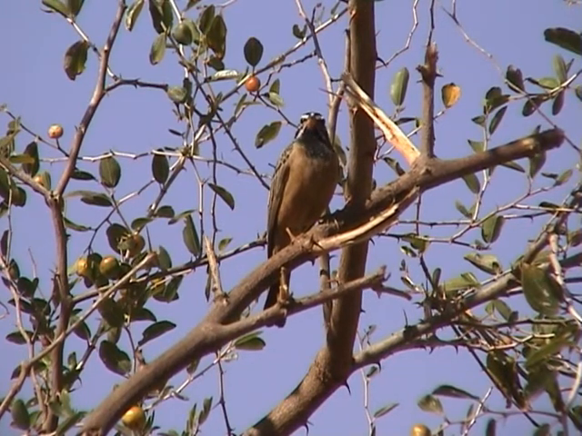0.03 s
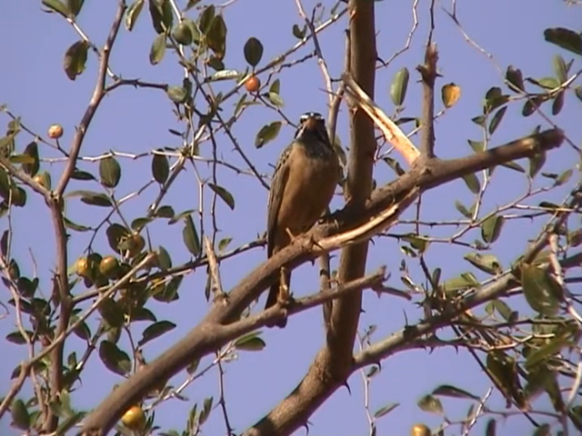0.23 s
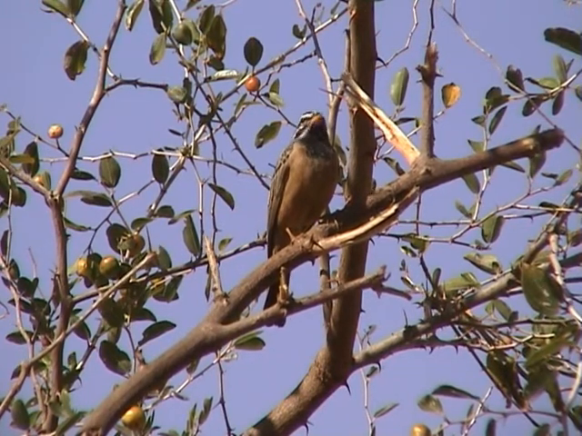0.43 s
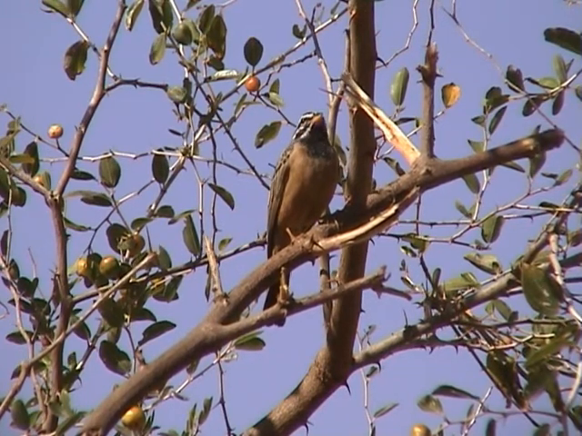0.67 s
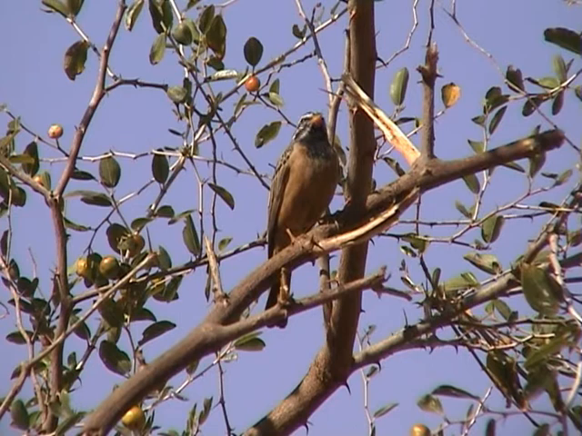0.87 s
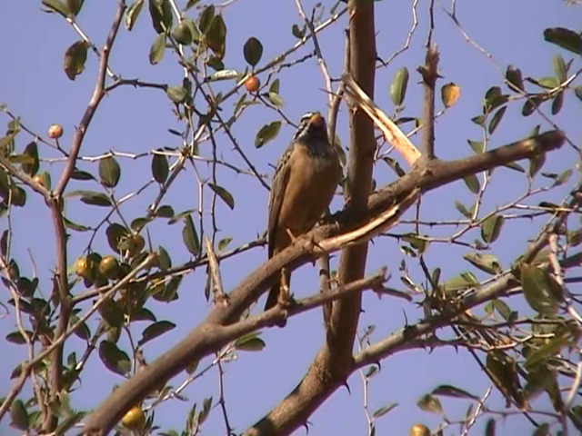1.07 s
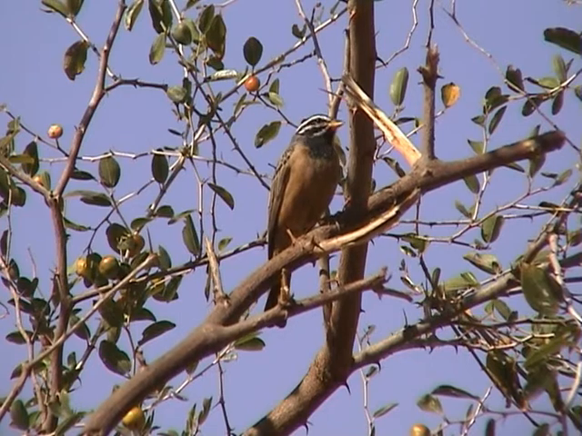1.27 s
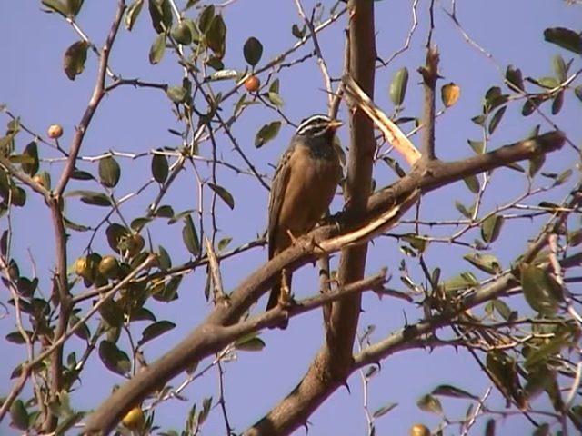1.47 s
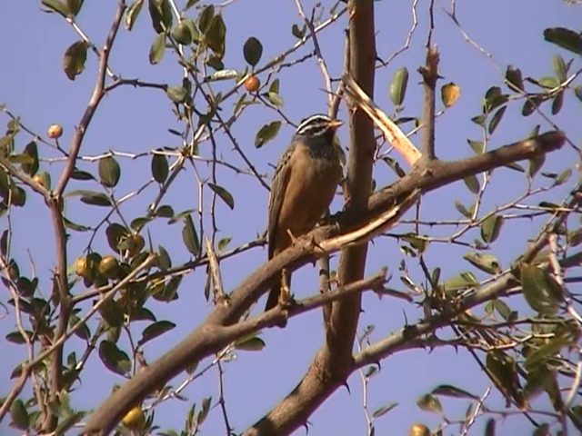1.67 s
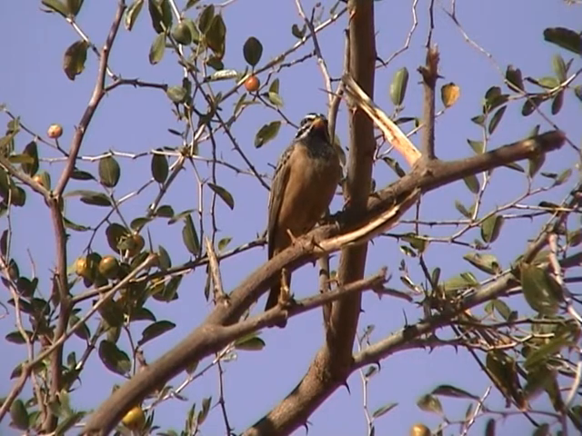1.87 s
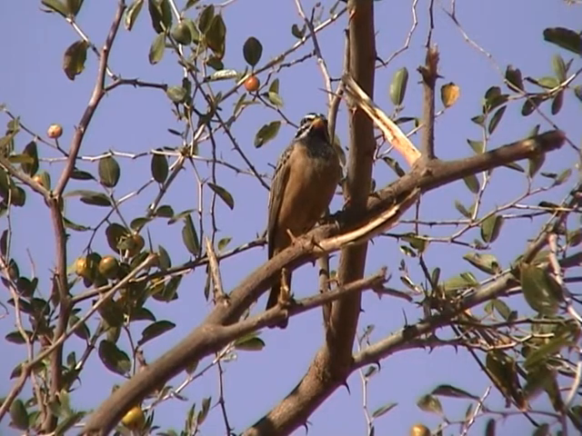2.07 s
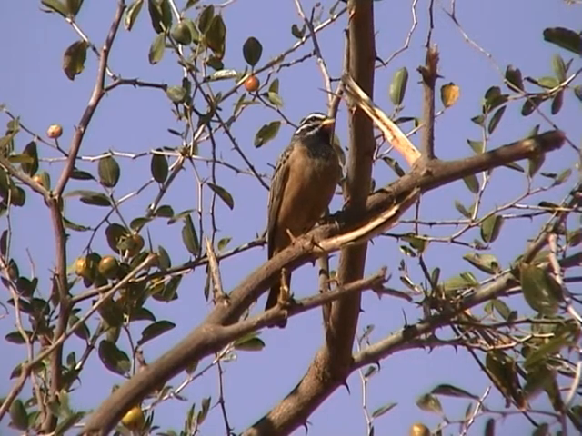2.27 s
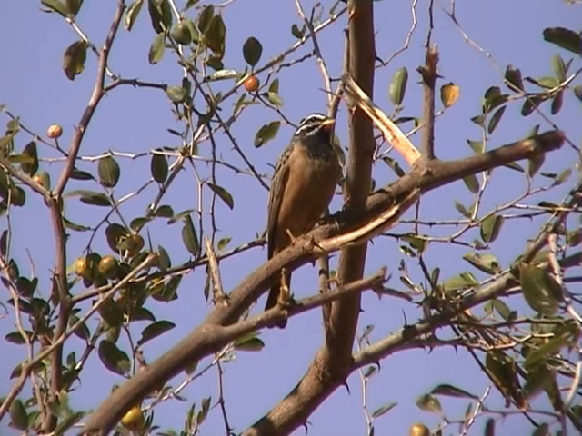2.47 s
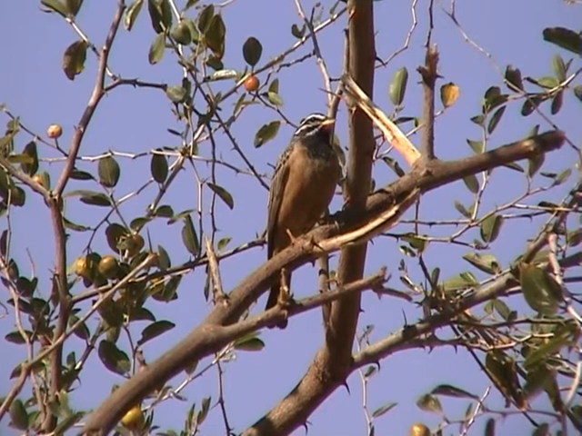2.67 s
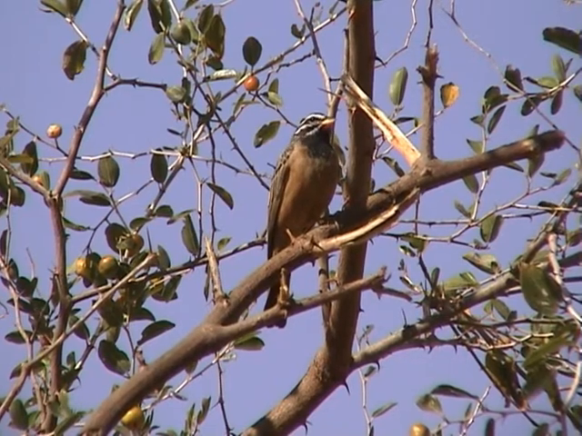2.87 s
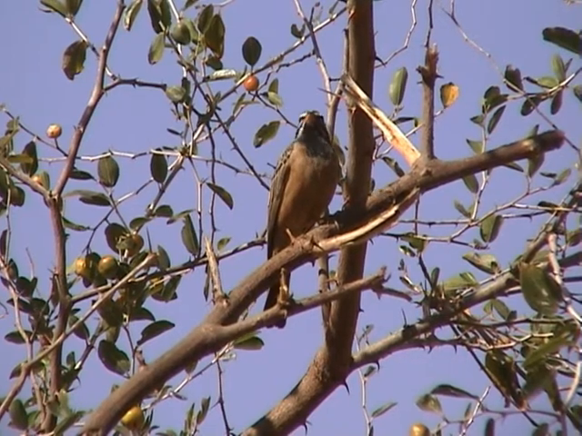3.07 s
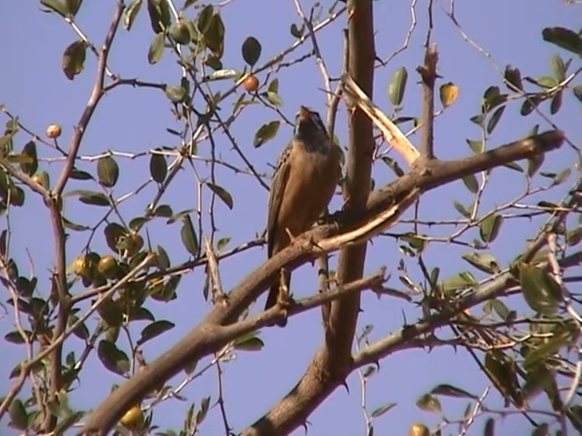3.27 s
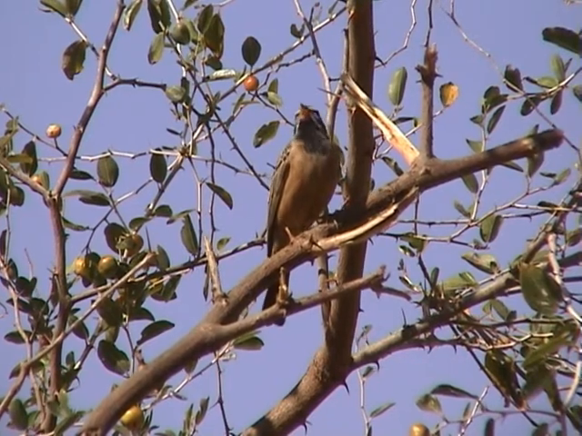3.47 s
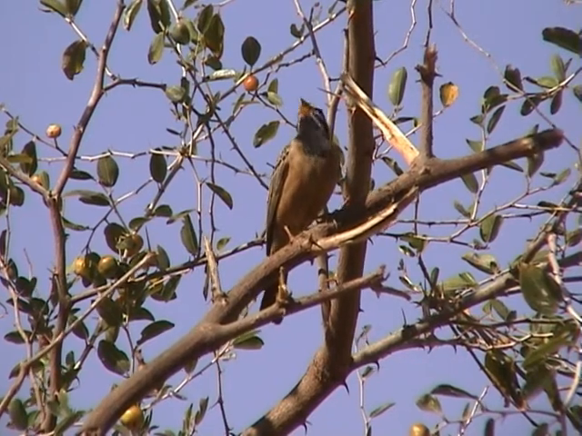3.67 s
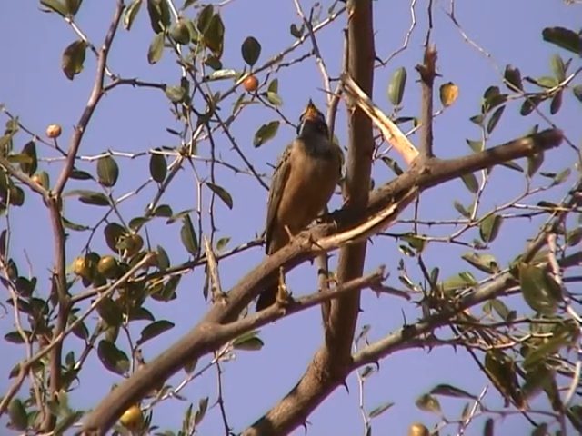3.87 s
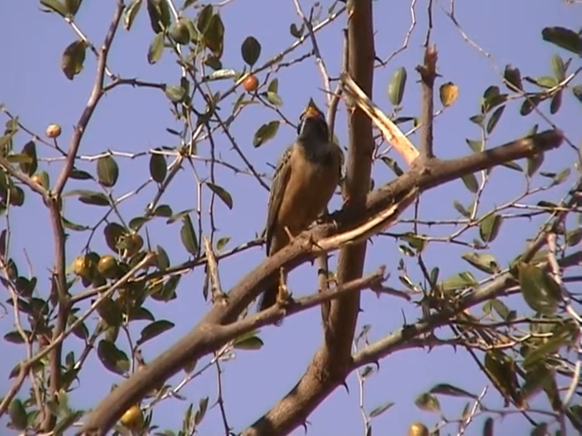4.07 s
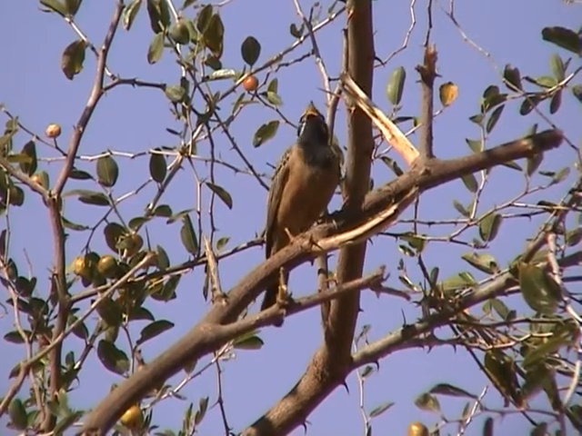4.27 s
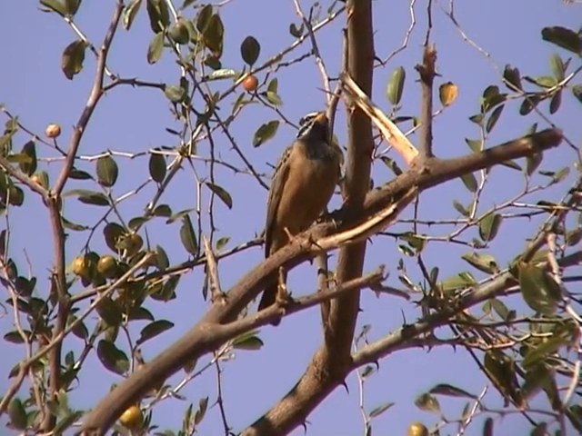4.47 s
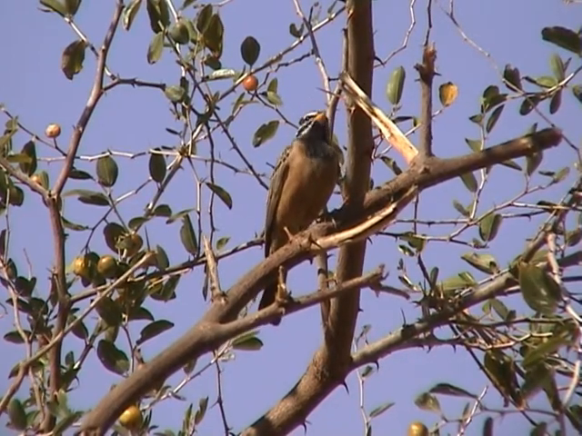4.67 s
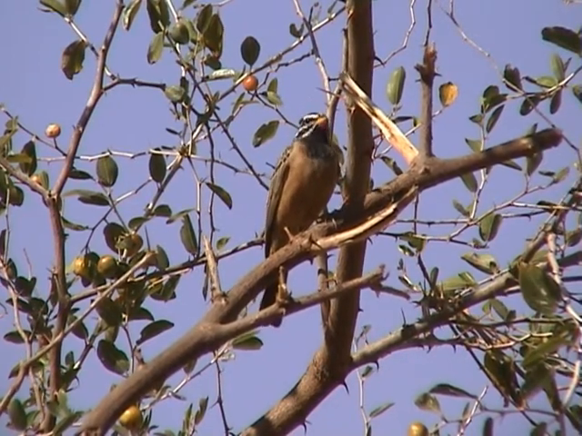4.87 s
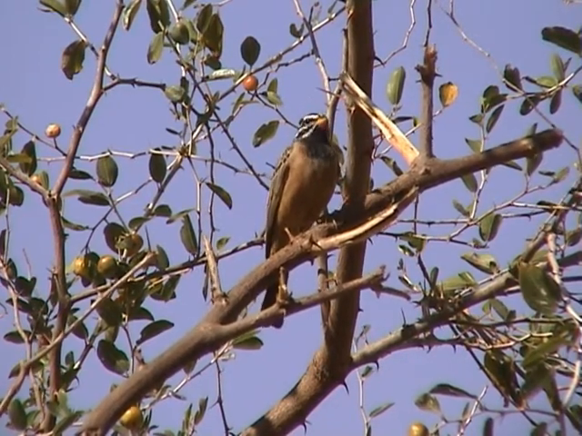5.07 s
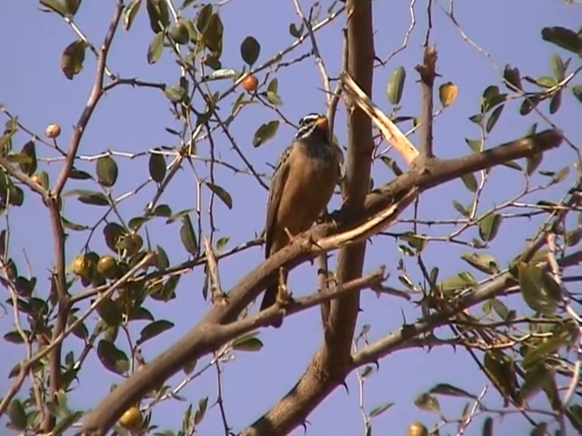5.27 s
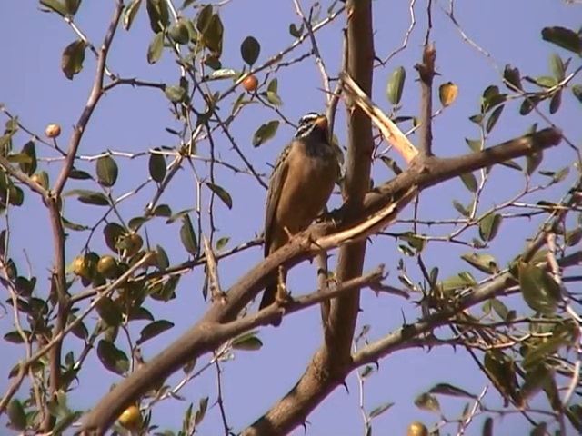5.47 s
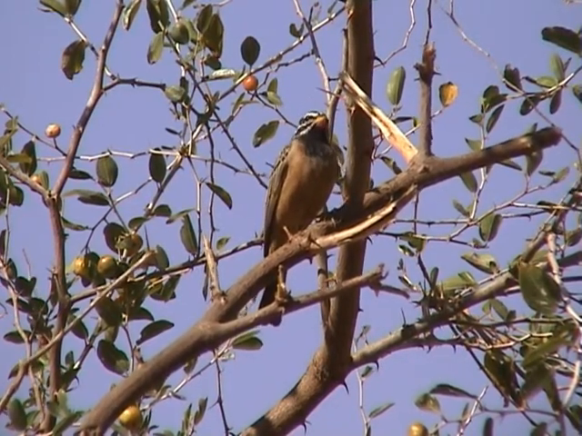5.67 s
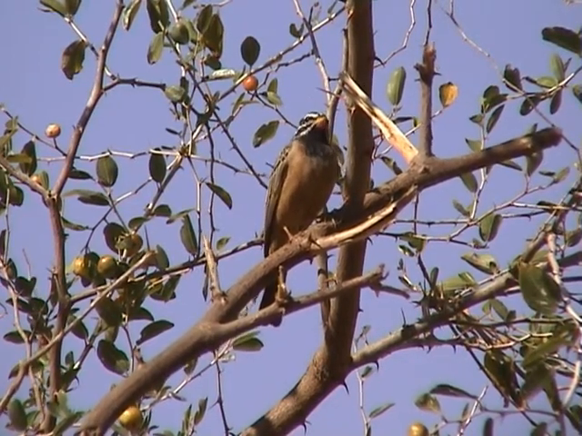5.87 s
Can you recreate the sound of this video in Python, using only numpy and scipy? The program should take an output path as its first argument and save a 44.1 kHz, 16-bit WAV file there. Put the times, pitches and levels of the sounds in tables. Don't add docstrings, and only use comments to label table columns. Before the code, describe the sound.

Outdoors by a gently bubbling stream, faint far birds call, then a near small bird delivers one bright, sliding, whistled phrase.

```python
import sys
import numpy as np
from scipy import signal
from scipy.fft import rfft, irfft, next_fast_len
from scipy.io import wavfile
from scipy.ndimage import uniform_filter1d, map_coordinates

SR = 44100
rng = np.random.default_rng(int(sys.argv[2]) if len(sys.argv) > 2 else 0)


def to_wav(s):
    ch = np.atleast_2d(s).T
    pcm = np.round(np.clip(ch, -1, 1) * 32767)
    wavfile.write(sys.argv[1], SR, pcm.astype(np.int16))


def gain_from_decibels(decibels):
    exponent = np.asarray(decibels, float) / 20
    return 10 ** exponent


N = 261513


def unit(x):
    return x / np.sqrt(np.mean(x ** 2) + 1e-20)


def along(points, hz):
    f, v = np.transpose(points)
    return np.interp(np.log(hz + 1), np.log(f + 1), v)


def filtered(x, response):
    m = next_fast_len(N + 8192)
    hz = np.fft.rfftfreq(m, 1 / SR)
    return irfft(rfft(x, m) * response(hz), m)[..., :N]


def wobble(rate):
    points = rng.standard_normal(int(N * rate / SR) + 4)
    return map_coordinates(points, [np.arange(N) * rate / SR])


def add(track, s, sound):
    part = track[..., round(s * SR):][..., :sound.shape[-1]]
    part += sound[..., :part.shape[-1]]


def bubble(hz, cycles, t, climb):
    k = hz * t / cycles
    ring = np.sin(2 * np.pi * hz * t * (1 + climb * k))
    return ring * np.exp(-k) * (1 - np.exp(-t * hz * 3))


def babble(count):
    # f/Hz, level/dB
    bubble_level = [(200, -10.5), (350, -5), (600, 6), (1300, 1.5), (3000, 9.5), (6000, -6.5), (12000, -24)]
    u = rng.random((count, 4))
    hz = 250 * 30 ** u[:, 1:2]
    size = gain_from_decibels(along(bubble_level, hz) - 3.85 * np.log(1 - .98 * u[:, 2:3]))
    step = np.arange(700)
    sound = size * bubble(hz, 1.41 + 3.14 * u[:, 3:], step / SR, climb=0.0875)
    at = (u[:, :1] * N).astype(int) + step
    return unit(np.bincount(at.ravel(), sound.ravel(), N + len(step))[:N])


def spread(pair):
    # f/Hz, likeness (0 to 1)
    alike = [(60, -0.0), (180, 0.68), (550, 0.64), (1650, 0.029), (4970, 0.52), (15000, 0.11)]
    # f/Hz, level/dB
    lean = [(60, 5.5), (150, -3), (380, 1.0), (950, -2.5), (2380, -8), (5980, -5), (15000, -0.5)]
    # f/Hz, phase/rad
    lead = [(50, -1.23), (260, -0.24), (950, -1.31), (2500, -0.3), (8000, -0.091), (15000, -0.19)]

    def turn(hz):
        likeness = along(alike, hz) / np.cos(along(lead, hz))
        return np.arccos(np.clip(likeness, 0, .75)) / 2

    def tilt(hz):
        half = np.array([[.5], [-.5]])
        return gain_from_decibels(half * along(lean, hz)) * np.exp(1j * half * along(lead, hz))

    mid, side = filtered(pair, lambda hz: np.array([np.cos(turn(hz)), np.sin(turn(hz))]))
    return filtered(np.array([mid + side, mid - side]), tilt)


def stream():
    # f/Hz, level per Hz/dB
    water = [(20, -45), (40, -36), (80, -20.5), (120, -23.5), (165, -11), (373, -2), (460, -3.5),
             (1060, -4.5), (1350, -3), (2670, -9), (5000, -16.5), (10200, -26), (15900, -27.5)]
    z = signal.stft(rng.standard_normal((2, N)), nperseg=512)[2]
    patches = rng.standard_normal(z.shape[1:])
    patches = uniform_filter1d(patches, size=8, axis=0)
    patches = uniform_filter1d(patches, size=8, axis=1)
    rush = signal.istft(z * gain_from_decibels(1.44 * unit(patches)), nperseg=512)[1][:, :N]
    rush = unit(filtered(rush, lambda hz: gain_from_decibels(along(water, hz))))
    bubbles = np.array([babble(count=3000), babble(count=3000)])
    flow_db = -46.5 + 0.2 * wobble(1.2) + 0.45 * wobble(6)
    return gain_from_decibels(flow_db) * spread(gain_from_decibels(2.0) * rush + gain_from_decibels(-5.0) * bubbles)


def plops():
    # t/s, peak level/dB, f/Hz
    large = [(.061, -36.5, 593), (.582, -41.5, 341.4), (.899, -41, 540), (1.038, -35, 369),
             (1.145, -43.5, 382), (1.263, -42.5, 379.5), (1.369, -37, 582), (1.578, -37, 592),
             (1.731, -41, 614), (2.019, -39, 574.8), (2.249, -50, 339), (2.289, -40.5, 578),
             (2.699, -46, 351.5), (2.88, -38.5, 373.4), (2.979, -33.5, 544), (2.995, -39, 600),
             (3.299, -41, 820), (3.434, -33, 622.4), (4.659, -40, 816), (4.888, -39, 520),
             (5.127, -37.5, 630), (5.599, -36, 771)]
    # t/s, peak level/dB, f/Hz, left minus right/dB
    small = [(0.285, -39.5, 2330, -3.5), (.3194, -44.5, 2150, -5), (.38, -41, 1710, -7),
             (0.5822, -38, 1320, -9), (0.8671, -34.5, 2990, -14), (2.975, -43, 1590, -8),
             (3.1148, -37.5, 1300, -5), (3.2351, -36.5, 1296, -15), (3.52, -37, 2340, -1.5),
             (4.9999, -32.5, 2470, -1), (5.6004, -33, 1310, -5), (5.898, -28, 2420, 1),
             (5.8975, -33, 856, 0)]
    out, t = np.zeros((2, N)), np.arange(SR // 10) / SR
    rows = [(*row, 1.3, 5.9) for row in large] + [(*row, 4.65) for row in small]
    for s, db, hz, pan_db, cycles in rows:
        sides_db = db + np.array([[pan_db], [-pan_db]]) / 2
        add(out, s, gain_from_decibels(sides_db) * bubble(hz, cycles, t, climb=0.0055))
    return out


def drive():
    # multiple of the turn rate, level/dB
    thump = [(1, -28.5), (2, -25.5), (3, -24.5), (4, -13.5), (5, -14.5), (6, -3.5), (7, -3.5), (8, -12.5),
             (9, -17.5), (10, -7.5)]
    turn_hz = 12.73
    turns = turn_hz * (np.arange(N) / SR - .0535)
    lag = np.array([[0], [1.5]])
    rattle = [(k, -15.5 + 0.8288 * (k - 11) + 2 * rng.standard_normal()) for k in range(11, 31)]
    hum = np.zeros((2, N))
    for k, db in thump + rattle:
        scatter = 3 * (k > 9) * rng.standard_normal()
        hum += gain_from_decibels(db) * np.cos(2 * np.pi * k * turns + lag + scatter)
    return gain_from_decibels(-61) * gain_from_decibels([[2.5], [-2.5]]) * hum


def insect():
    # t/s, level/dB
    rasps = [(.158, -54), (.447, -54), (.737, -53), (1.05, -51.5), (1.36, -56.5), (1.71, -55.5),
             (2.02, -54.5), (2.19, -62), (2.39, -53.5), (2.715, -57.5), (4.82, -58), (5.86, -52)]
    ring_hz, width_hz, stroke_s = 4900, 1900, .055
    ticks = (rng.random(N) < 1600 / SR) * rng.standard_normal(N)

    def wing(f):
        return (1j * f * width_hz / (ring_hz ** 2 - f * f + 1j * f * width_hz)) ** 2

    ring = unit(filtered(ticks, wing))
    stroke = np.zeros(N)
    for s, db in rasps:
        add(stroke, s, gain_from_decibels(db) * np.hanning(round(stroke_s * SR)))
    return gain_from_decibels([[-1.5], [3]]) * stroke * ring


def grove(x, wet_db, shared):
    # f/Hz, t/s
    fade = [(2000, 0.37), (5000, 0.6), (10000, 0.05)]
    hz, t, z = signal.stft(rng.standard_normal((2, SR // 2)), SR, nperseg=256)
    fading = gain_from_decibels(-60 * t / along(fade, hz)[:, None])
    mid, side = signal.istft(z * fading, SR, nperseg=256)[1]
    tail = np.array([mid + (1 - shared) * side, mid - (1 - shared) * side])
    tail = tail / np.linalg.norm(tail[0])
    return gain_from_decibels(wet_db) * signal.fftconvolve(x[None], tail, axes=1)[:, :N]


def syrinx(hz, gain, overtone_db):
    phase = 2 * np.pi * np.cumsum(hz) / SR + rng.uniform(0, 2 * np.pi)
    octave = (hz < SR / 6) * np.sin(2 * phase)
    return gain * (np.sin(phase) + gain_from_decibels(overtone_db) * octave)


def bent(rows, bend):
    return [(s, length, a, a + bend * (b - a), b, db) for s, length, a, b, db in rows]


def notes(rows, blunt, buzz_below_hz=0):
    out = np.zeros(N)
    for s, length, *hz, db in rows:
        u = np.linspace(0, 1, round(length * SR))
        pitch = np.polyval(np.polyfit([0, .5, 1], hz, deg=2), u)
        late = 1.25 if hz[2] > 1.15 * hz[0] and length > .01 else 1
        gain = gain_from_decibels(db) * np.abs(np.sin(np.pi * u ** late)) ** blunt
        if max(hz) < buzz_below_hz:
            shake = 2 * np.pi * 280 * length * u + rng.uniform(0, 2 * np.pi)
            rough = uniform_filter1d(rng.standard_normal(len(u)), size=30)
            pitch = pitch + 300 * np.sin(shake) + 1000 * rough - 100
            gain = gain * (1 + .5 * np.sin(shake + .3))
        add(out, s, syrinx(pitch, gain, overtone_db=-28))
    return out


def trill():
    # t/s, peak level/dB, f/Hz
    pips = [(1.5185, -40, 2436), (1.6272, -44, 2410), (1.7501, -39.5, 2450), (1.8292, -43.5, 2554),
            (1.8896, -46, 2460), (1.9464, -44.5, 2600), (2.0111, -42, 2480), (2.0697, -41, 2630),
            (2.141, -42.5, 2522), (2.2101, -44, 2656), (2.252, -41.5, 2758), (2.3176, -45, 2930),
            (2.3426, -43, 2605), (2.4407, -39, 2645), (2.5794, -46.5, 2486)]
    rows = [(s - .007, .024, 1.1 * hz, 1.01 * hz, 0.965 * hz, db - 3.5) for s, db, hz in pips]
    return notes(rows, blunt=0.75)


def far_birds():
    # t/s, length/s, start f/Hz, end f/Hz, peak level/dB
    second_bunting = [(.928, 0.026, 6000, 4320, -48), (1.008, 0.018, 4820, 3690, -48.5),
                      (1.077, .036, 7530, 3980, -46.5), (1.135, .018, 4160, 3690, -48),
                      (1.2, .018, 7300, 5720, -49), (1.245, 0.0235, 3947, 3300, -50),
                      (1.318, 0.0086, 7750, 4780, -52.5), (1.328, 0.013, 4900, 4100, -48.5),
                      (1.372, .016, 3440, 5800, -50), (5.185, .036, 7610, 6200, -55),
                      (5.228, .014, 4974, 4600, -47)]
    mellow = [(.054, .025, 2900, 2820, -45.5), (.15, 0.0315, 2940, 2785, -50.5),
              (.259, .025, 2500, 2300, -50), (.298, .022, 2308, 2460, -53),
              (.341, 0.021, 1980, 2085, -47.5), (1.448, 0.028, 1335, 2170, -41),
              (2.403, 0.029, 1945, 2306, -46), (2.552, .027, 2155, 2300, -41),
              (2.647, .019, 2210, 2050, -48), (3.525, .01, 8400, 8300, -57), (5.469, .015, 3010, 2910, -48),
              (5.669, .032, 2590, 2750, -50.5)]
    calls = notes(bent(second_bunting, .36) + bent(mellow, .55), blunt=0.36)
    return (calls + trill()) * gain_from_decibels(2.6 * wobble(250))


def reflected(x):
    # f/Hz, level/dB
    ground = [(2500, -12), (3700, -9), (4400, -3.5), (5500, -5), (6500, -9), (9000, -14)]
    late_s = np.array([[.004125], [.004135]])
    return filtered(x, lambda hz: 1 - gain_from_decibels(along(ground, hz)) * np.exp(-2j * np.pi * hz * late_s))


def slope(x):
    blur = rng.standard_normal((2, 260)) * np.hanning(260)
    late = np.pad(blur / np.linalg.norm(blur[0]), ((0, 0), (round(.047 * SR), 0)))
    echo = signal.fftconvolve(x[None], late, axes=1)[:, :N]
    return gain_from_decibels(-19.5) * filtered(echo, lambda hz: 1 / (1 + (hz / 5500) ** 4))


def chips():
    # t/s, length/s, peak level/dB
    buzzes = [
        (3.42, .014, -47),
        (3.584, 0.0143, -45),
        (3.694, 0.022, -40),
        (3.777, 0.026, -35),
        (3.861, 0.034, -31.5),
    ]
    # start, middle, end f/Hz
    buzz_hz = (3300, 3510, 3280)
    # t/s, length/s, start f/Hz, end f/Hz, peak level/dB
    hooks = [
        (3.431, 0.027, 6320, 7650, -37),
        (3.596, .026, 6100, 7635, -35),
        (3.733, .012, 7660, 8000, -45),
    ]
    climbs = [
        (3.707, .023, 6120, 7950, -33),
        (3.792, .021, 6150, 7770, -31),
    ]
    flicks = [
        (3.675, .0049, 5300, 4340, -41),
        (3.759, .0075, 5350, 3800, -32.5),
        (3.844, .008, 5400, 3800, -29.5),
        (3.882, 0.017, 7200, 5430, -38),
        (3.8955, .0025, 6160, 3940, -24),
        (3.929, .014, 4800, 3050, -32),
        (3.936, .008, 7350, 5650, -32.5),
        (3.9445, .0032, 6930, 4240, -21),
    ]
    slurs = [
        (3.905, .021, 5750, 3790, -19),
    ]
    # t/s, peak level/dB
    ticks = [
        (4.03, -18),
        (4.1534, -27),
        (4.23, -24),
    ]
    rows = [(s, length, *buzz_hz, db) for s, length, db in buzzes]
    rows += [(s, .002, 4900, 5800, 8400, db) for s, db in ticks]
    rows += bent(hooks, .93) + bent(climbs, .54) + bent(flicks, .45) + bent(slurs, .3)
    return notes(rows, blunt=0.39, buzz_below_hz=3950)


def warble():
    # t/s, peak level/dB
    strokes = [
        (4.054, -23),
        (4.066, -22),
        (4.0786, -20.5),
        (4.09, -19),
        (4.1017, -18.5),
        (4.1125, -17.5),
    ]
    # start, middle, end f/Hz
    stroke_hz = (4872, 4280, 3704)
    # t/s, length/s, start f/Hz, end f/Hz, peak level/dB
    closing = [
        (4.12, .0065, 4150, 4050, -18.5),
    ]
    stroke_s = .0092
    rows = [(s, stroke_s, *stroke_hz, db) for s, db in strokes]
    return notes(rows + bent(closing, .45), blunt=0.6)


def whistle(t, hz, db):
    # f/Hz, level/dB
    throat = [(2200, -38), (3085, -15), (3615, -7), (4540, -.5), (5500, 0), (6800, -2), (7600, -15),
              (9200, -25)]
    attack_s, attack_db, release_s, release_db = 0.008, 9, .011, 7.5
    since, left = t - t[0], t[-1] - t
    edge = np.clip(np.minimum(since, left) / 0.00074, 0, 1)
    swell_db = -attack_db * np.clip(1 - since / attack_s, 0, 1)
    ease_db = -release_db * np.clip(1 - left / release_s, 0, 1)
    gain = edge * gain_from_decibels(db + along(throat, hz) + swell_db + ease_db)
    return syrinx(hz, gain, overtone_db=-32)


def whistles():
    # t/s, length/s, start f/Hz, settling f/Hz, peak level/dB
    dives = [
        (4.035, 0.0179, 9480, 4978, -16.5),
        (4.238, .02, 9480, 5510, -19),
    ]
    # t/s, f/Hz
    slides = [
        [(3.983, 8200), (3.995, 7380), (4.005, 6490), (4.025, 4300)],
        [(4.157, 9180), (4.164, 7690), (4.173, 6910), (4.181, 5440), (4.188, 4620), (4.195, 4100)],
        [(4.258, 7700), (4.263, 6000), (4.269, 5050), (4.276, 4600), (4.29, 4190), (4.308, 3770), (4.34, 3170),
         (4.356, 2810), (4.38, 2050)],
    ]
    slide_db = (-15.5, -14, -15)
    dive_s, sag_hz_per_s = .0043, 60000
    out = np.zeros(N)
    for s, length, start_hz, settle_hz, db in dives:
        t = np.arange(0, length, 1 / SR)
        dive = (start_hz - settle_hz) * np.exp(-t / dive_s)
        add(out, s, whistle(t, settle_hz + dive - sag_hz_per_s * t, db))
    for path, db in zip(slides, slide_db):
        s, hz = np.transpose(path)
        t = np.arange(s[0], s[-1], 1 / SR)
        pitch = uniform_filter1d(np.interp(t, s, hz), size=130, mode="nearest")
        add(out, s[0], whistle(t, pitch, db))
    return out


def singer():
    return (chips() + warble() + whistles()) * gain_from_decibels(1.3 * wobble(250))


def scene():
    bird = singer()
    others = far_birds()
    near = reflected(bird) * gain_from_decibels([[.3], [-.2]])
    near = near + grove(bird, wet_db=-16.5, shared=.1) + slope(bird)
    far = others * gain_from_decibels([[-2.5], [1.5]]) + grove(others, wet_db=-6, shared=.3)
    return near + far + insect() + stream() + plops() + drive()


def roll_off(x):
    return signal.sosfilt(signal.butter(12, 16220, fs=SR, output="sos"), x)


def record(dry):
    tape_hz, cut_hz = 32000, 15900
    tape = signal.resample_poly(dry, up=tape_hz // 100, down=SR // 100, axis=1)
    held = tape[:, np.arange(N) * tape_hz // SR]
    mix = filtered(held, lambda hz: hz < cut_hz)
    return roll_off(mix)


dry = scene()
out = record(dry)
to_wav(out)
```